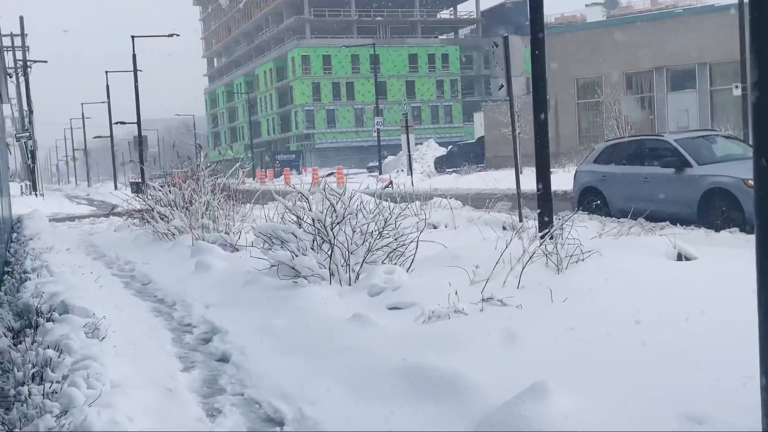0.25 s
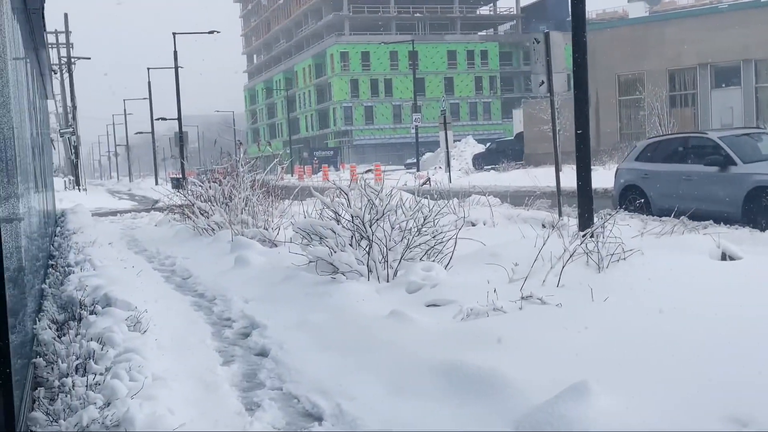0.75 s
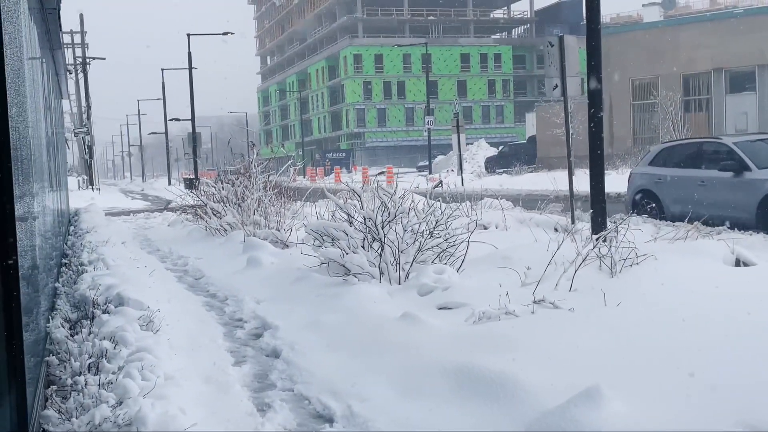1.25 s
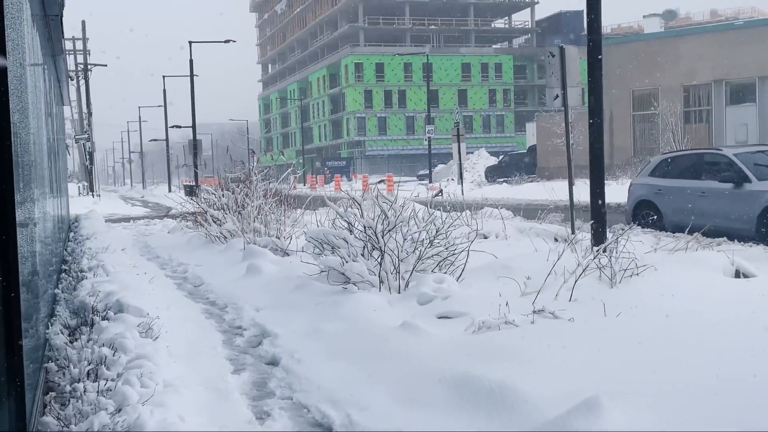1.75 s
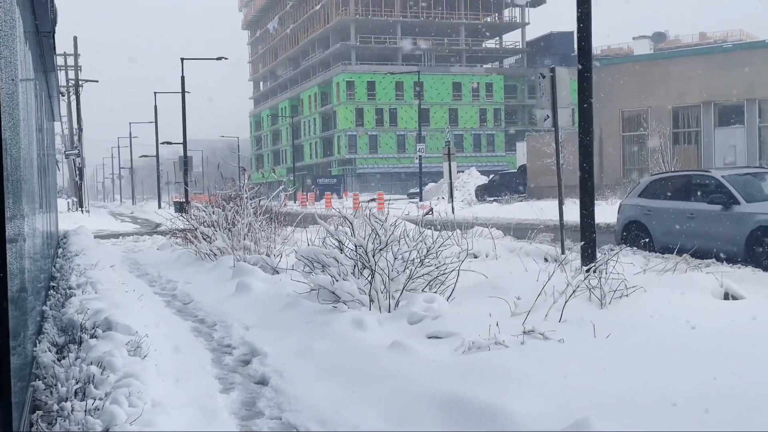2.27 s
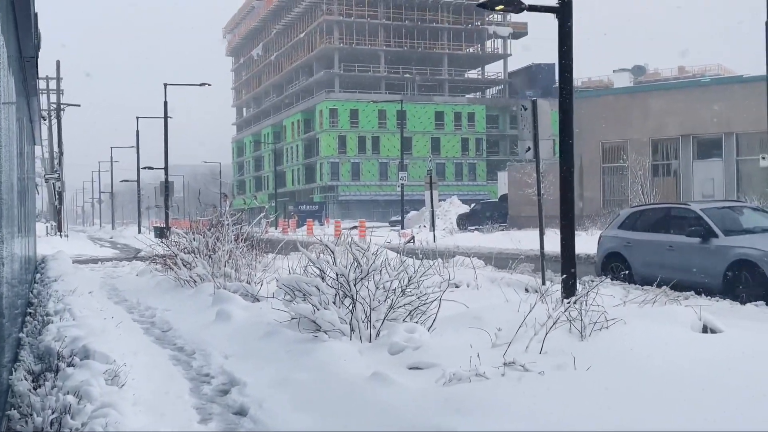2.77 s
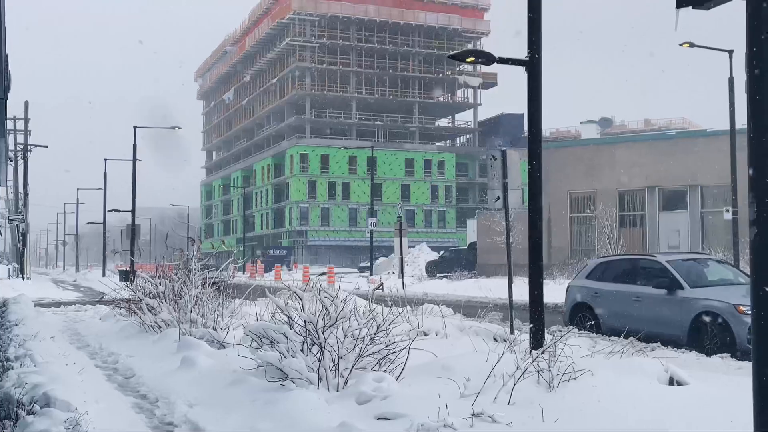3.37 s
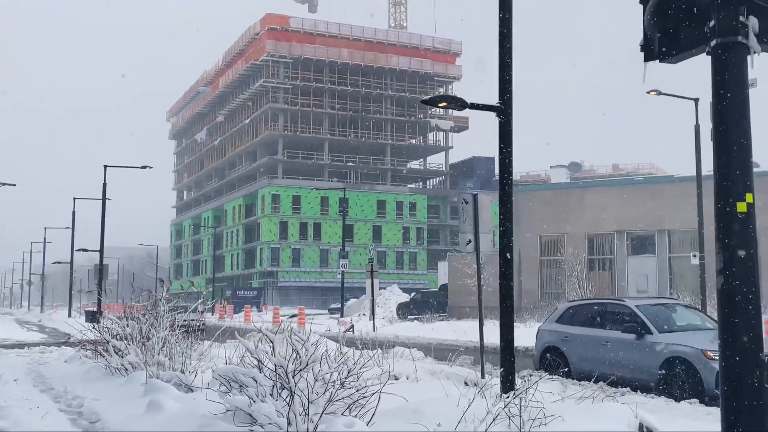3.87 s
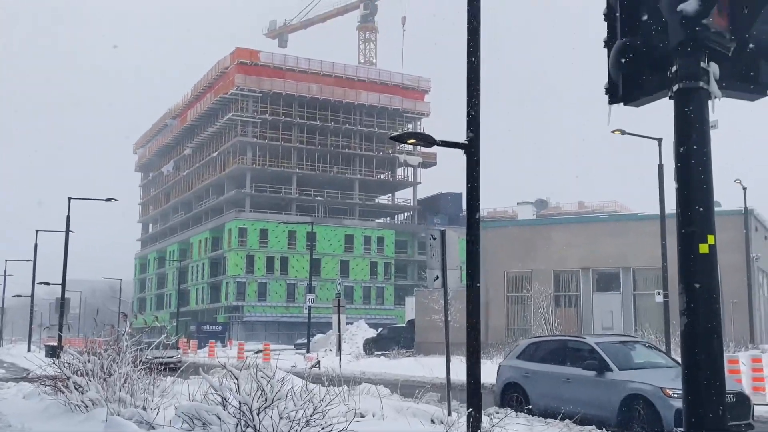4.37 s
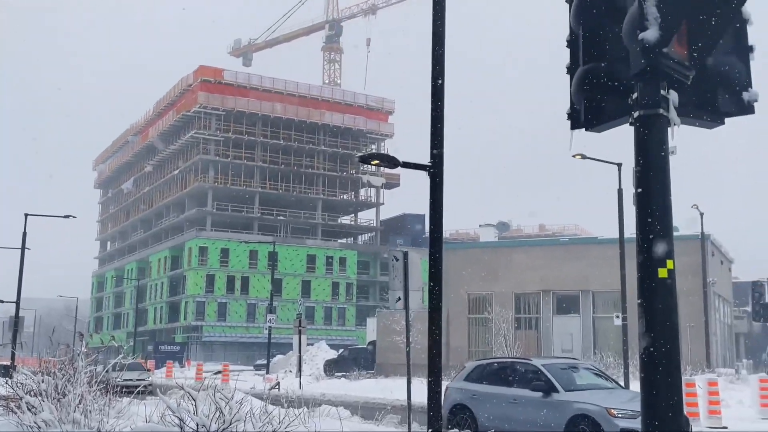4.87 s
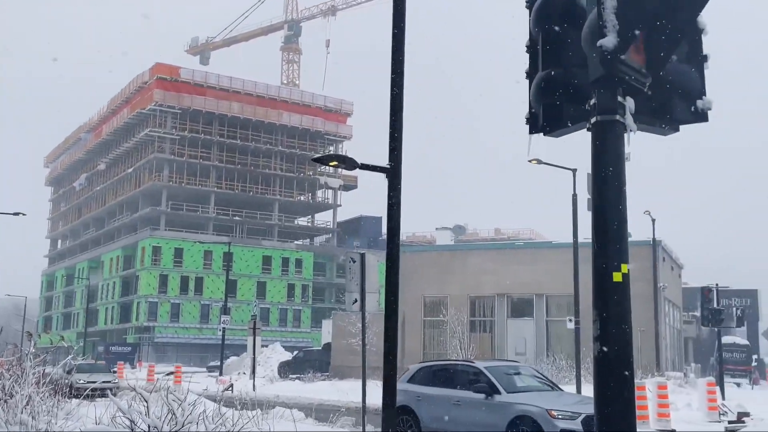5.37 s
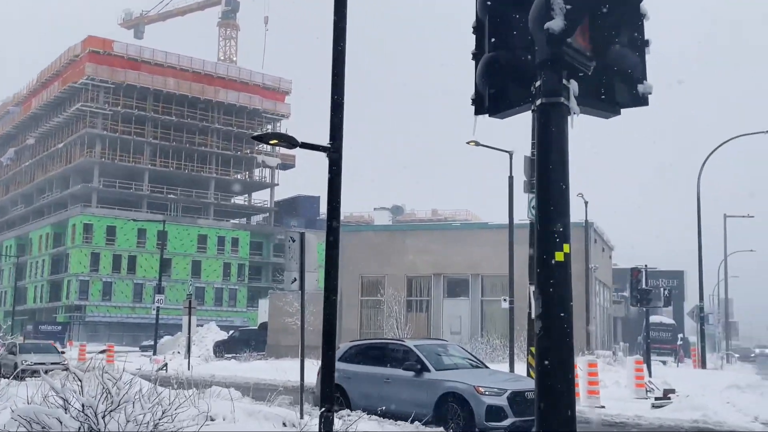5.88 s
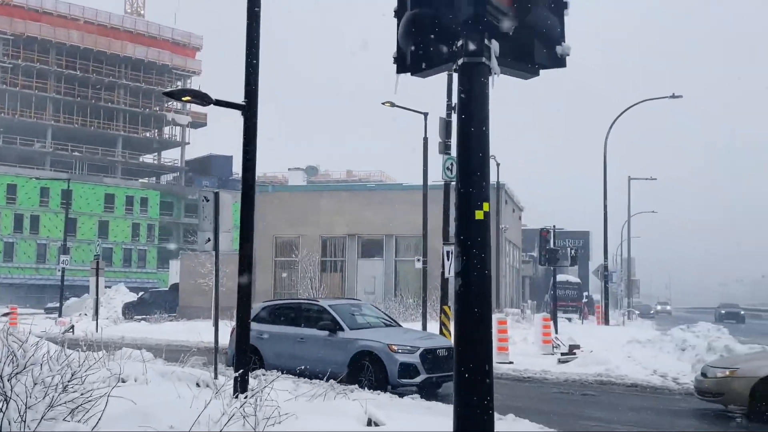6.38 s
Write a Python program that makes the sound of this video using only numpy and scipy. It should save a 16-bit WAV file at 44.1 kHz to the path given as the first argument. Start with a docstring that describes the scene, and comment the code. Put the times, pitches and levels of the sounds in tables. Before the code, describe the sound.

Wet tyres swell, swish by and fade over a distant traffic roar, with gusty low wind buffeting and faint brake squeaks late on.

```python
"""A snowy city street from the pavement, on a windy day, with a stereo microphone out in the wind.
First a far roar of shaped noise, an engine's low tones pulling away, and wind: rumbling noise, pressure thumps.
A car nears, its tyres a moving noise spectrum with spray and ticking drops; near 2.2 s its exhaust tones sink.
Then slush swishes on as it leaves and a far engine hums. Late on come gliding brake tones, dull slaps of
slush, one high tick and an engine throb further off, all in front of the roar."""
import sys
import numpy as np
from scipy import signal
from scipy.fft import rfft, irfft
from scipy.io import wavfile
from scipy.ndimage import uniform_filter1d

SR = 44100
rng = np.random.default_rng(int(sys.argv[2]) if len(sys.argv) > 2 else 0)


def unload_audio(sound):
    """Save the sound as a 16-bit wav file, at the path given as the first command line argument."""
    columns = np.transpose(np.atleast_2d(sound))
    # keep every value between -1 and 1, then stretch to whole-number steps
    steps = np.round(np.clip(columns, -1, 1) * 32767)
    wavfile.write(sys.argv[1], SR, steps.astype(np.int16))


N = 292383
TIME = np.arange(N) / SR
FRAME_S = np.arange(N // 256 + 5)[:, None] * 256 / SR  # one frame every 256 samples
BIN_HZ = np.fft.rfftfreq(1024, 1 / SR)


def amp(db):
    """Decibels to gain."""
    return 10 ** (np.asarray(db) / 20)


def unit(x):
    """Scales to rms 1."""
    return x / np.sqrt(np.mean(abs(x) ** 2) + 1e-30)


def bump(x, centre, half_width):
    """A smooth rise and fall of height 1 around a time or frequency."""
    return np.exp(-((x - centre) / half_width) ** 2)


def ramp(t, s, length):
    """A smooth step from 0 to 1 around the time s."""
    return (1 + np.tanh((t - s) / length)) / 2


def over_hz(points, hz):
    """Reads a table on a log-frequency axis."""
    f, value = np.transpose(points)
    return np.interp(np.log(hz + 1), np.log(f + 1), value)


def by_frame(curve):
    """Reads a curve at the frame times."""
    return np.interp(FRAME_S, TIME, curve)


def waver(rate_hz):
    """Slow random motion of rms 1, mostly below rate_hz."""
    hz = np.fft.rfftfreq(N, 1 / SR)
    slow = rfft(rng.standard_normal(N)) / (1 + (hz / rate_hz) ** 4)
    return unit(irfft(slow, N))


def coloured(gain, likeness):
    """Two channels of unit noise with a spectrum gain(Hz) and a given likeness."""
    hz = np.fft.rfftfreq(N, 1 / SR)
    mid, side = irfft(rfft(rng.standard_normal((2, N))) * gain(hz), N)
    side = side * np.sqrt(abs((1 - likeness) / (1 + likeness)))
    return unit(np.array([mid + side, mid - side]))


def noise_band(centre_hz, width_hz, likeness):
    """Two channels of unit noise in one bell-shaped band."""
    return coloured(lambda hz: bump(hz, centre_hz, 2 * width_hz), likeness)


def band_power(centre_hz, width_hz):
    """A bell-shaped band over the bins, with a fixed total power."""
    bell = np.exp(-.5 * ((BIN_HZ - centre_hz) / width_hz) ** 2)
    return bell / bell.sum(-1, keepdims=True) / 2


def shape(points, reference_hz):
    """A spectrum scaled to unit power in its reference band."""
    low_hz, high_hz = reference_hz
    gain = amp(over_hz(points, BIN_HZ))
    return gain / np.linalg.norm(gain[(BIN_HZ > low_hz) & (BIN_HZ < high_hz)])


def patches(size):
    """A smooth random field of rms 1; size is its smoothing in (frames, bins)."""
    field = rng.standard_normal((len(FRAME_S), len(BIN_HZ)))
    for axis in (0, 1, 0, 1):
        field = uniform_filter1d(field, size[axis], axis)
    return unit(field)


def steadied(x, span_s):
    """Evens out the slow level of a noise, so that an envelope alone sets it."""
    return x / np.sqrt(uniform_filter1d((x ** 2).mean(0), size=int(span_s * SR)))


def image(rows):
    """Likeness and phase between the microphone's two ports as one complex value for each bin."""
    hz, likeness, turns = np.transpose(rows)
    size = np.clip(over_hz(np.c_[hz, likeness], BIN_HZ), 0, 1)
    return size * np.exp(2j * np.pi * over_hz(np.c_[hz, turns], BIN_HZ))


# the street between the two ports while the car approaches: pitch_hz, likeness (0-1), phase_turns
APPROACH_IMAGE = [(60, 0.7, 0.096), (330, 0.76, 0.035), (530, 0.8, 0.25), (1010, 0.42, 0.31),
                  (1300, 0.46, 0.39), (1600, 0.1, 0.49), (1940, 0.53, 0.9), (2200, 0.62, 0.82),
                  (2900, 0.97, 1), (3600, 0.96, 1), (13000, 1, 1)]
# the same once the car has passed: pitch_hz, likeness (0-1), phase_turns
LEAVING_IMAGE = [(60, 0.76, 0.093), (330, .62, -0.065), (530, 0.1, 0.081), (710, 0.16, 0.31),
                 (1000, 0.17, 0.28), (1660, 0.64, 0.11), (1890, .32, 0.097), (2170, 0.37, 0.093),
                 (2470, 0.76, -.06), (2900, 0.84, -0.083), (3700, 0.96, -0.026), (6100, 1, 0.05),
                 (13000, 1, -0.054)]
IMAGE_SWING_S, IMAGE_SWING_LENGTH_S = 2.2, 0.14


def street_noise(magnitude):
    """Noise from a time-varying spectrum as two ports hear it; its image swings across as the car goes by."""
    a, b, c, d = rng.standard_normal((4, len(FRAME_S), len(BIN_HZ)))
    past = ramp(FRAME_S, IMAGE_SWING_S, IMAGE_SWING_LENGTH_S)
    same = (1 - past) * image(APPROACH_IMAGE) + past * image(LEAVING_IMAGE)
    left = a + 1j * b
    right = same * left + np.sqrt(abs(1 - abs(same) ** 2)) * (c + 1j * d)
    z = np.array([left, right]) * magnitude
    return np.sqrt(2) * signal.istft(z.transpose(0, 2, 1), nperseg=1024, noverlap=768)[1][:, :N]


# colour of the far roar, before scaling to unit power in a band: pitch_hz, level_db (per Hz)
ROAR = [(20, -42), (55, -10), (120, -0.5), (250, 0.5), (330, -1), (430, -3), (560, -1), (750, 0.5),
        (1200, -3.5), (1800, -7), (2600, -14.5), (5000, -28.5), (8000, -38), (15000, -56)]


def far_traffic(level_db=-37.5, swell_db=1.66, swell_s=1.75, swell_length=1.0, patchy_db=1.21):
    """The diffuse roar of the streets around, a little louder as the car goes by."""
    roar_db = level_db + swell_db * bump(FRAME_S, swell_s, swell_length)
    colour = shape(ROAR, reference_hz=(450, 1300))
    return street_noise(amp(roar_db + patchy_db * patches(size=(14, 3))) * colour)


def facades(x, echo_db=-10, drift=.0006, count=10):
    """Buildings across the street send back weak echoes; their paths change as the cars move."""
    echoes = np.zeros((2, N))
    delays_s = rng.uniform(.008, .06, count)
    speeds = rng.uniform(-1, 1, count)
    signs = rng.choice([-1, 1], count)
    for delay_s, speed, sign in zip(delays_s, speeds, signs):
        earlier = np.round(abs(TIME - delay_s - drift * speed * TIME) * SR).astype(int)
        echoes += sign * x[:, np.minimum(earlier, N - 1)]
    return (x + amp(echo_db) * echoes / np.sqrt(count)) / np.hypot(1, amp(echo_db))


def engine(hz, level, orders, unsteady, flutter_db):
    """Firing tones, at multiples of hz, that wander a little in pitch and strength."""
    s, db = np.transpose(level)
    turns = np.cumsum(hz * (1 + unsteady * waver(13.1))) / SR
    fade = np.interp(TIME, [s[0] - .2, s[0], s[-1], s[-1] + .2], [0, 1, 1, 0])
    tones = np.zeros(N)
    for multiple, order_db in orders:
        strength = amp(order_db + flutter_db * waver(3.7))
        tones += strength * np.sin(2 * np.pi * (multiple * turns + rng.random()))
    return np.sqrt(2) * fade * amp(np.interp(TIME, s, db)) * tones


HUM_HZ = 99.5
# a brief far engine hum: time_s, level_db
HUM_LEVEL = [(3.7, -35.5), (4.0, -39), (4.2, -38.5)]


def far_hum():
    """A nearly steady engine note that comes through once the close car has gone by."""
    return engine(HUM_HZ, HUM_LEVEL, [(1, 0)], unsteady=0.01, flutter_db=-0.5)


THROB_HZ, THROB_RISE_HZ_PER_S = 56.8, 1.8  # it speeds up slowly
# a low engine throb further off, before its tones' own levels: time_s, level_db
THROB_LEVEL = [(4.6, -44), (5.0, -43), (5.45, -37), (5.6, -40), (5.85, -38), (6.03, -43), (6.28, -38),
               (6.47, -31.5), (6.63, -41)]


def throb():
    """An uneven engine further down the street: three firing tones that wander."""
    hz = THROB_HZ + THROB_RISE_HZ_PER_S * (TIME - THROB_LEVEL[0][0])
    return engine(hz, THROB_LEVEL, [(1, 3.0), (1.5, -10), (2.5, -5)], unsteady=0.024, flutter_db=0.9)


PULL_HZ, PULL_RISE_HZ_PER_S = 52, 3.2
# another engine pulling away at the start: time_s, level_db
PULL_LEVEL = [(0, -47), (.3, -52), (.5, -38), (.65, -35.5), (.85, -45)]


def pulling_away():
    """The low note of an engine gathering speed, soon lost in the street."""
    return engine(PULL_HZ + PULL_RISE_HZ_PER_S * TIME, PULL_LEVEL, [(1, 0)], unsteady=0.02, flutter_db=0.5)


# faint far brakes: start_s, rise_s, decay_s, pitch_hz (at the start), glide (share per s, at first), level_db
SQUEAKS = [(4.81, 0.056, 0.04, 494, .4, -35.5), (5.243, .01, 0.05, 1755, -0.57, -37),
           (5.445, 0.027, 0.046, 373, -0.54, -38)]


def squeaks(unsteady=0.0041, settle_s=.08):
    """Short tones from far brakes: each swells, slides to its final pitch and trails off."""
    wander = 1 + unsteady * waver(39.5)
    out = np.zeros(N)
    for s, rise_s, decay_s, hz, glide, db in SQUEAKS:
        age = np.maximum(TIME - s, 0)
        slide = 1 + glide * settle_s * np.tanh(age / settle_s)
        turns = np.cumsum(hz * wander * slide) / SR
        envelope = np.minimum(age / rise_s, 1) * np.exp(-np.maximum(age - rise_s, 0) / decay_s)
        out += amp(db) * envelope * np.sqrt(2) * np.sin(2 * np.pi * turns)
    return out


# small soft slaps of slush further off: loudest_s, half_length_s, centre_hz, width_hz, level_db
SLAPS = [(4.88, 0.017, 570, 45, -36), (5.075, .025, 700, 180, -38), (5.26, .015, 580, 60, -41),
         (5.265, 0.018, 1520, 130, -39)]


def slaps():
    """Each lump of slush lands as a short dull puff of noise."""
    out = np.zeros((2, N))
    for s, length, hz, width_hz, db in SLAPS:
        out += amp(db) * np.sqrt(bump(TIME, s, length)) * noise_band(hz, width_hz, likeness=0.41)
    return out


def tick(s=4.779, db=-42, hz=12000, length=.00014):
    """One faint, very high tick close by: a tone burst of a few cycles."""
    return amp(db) * bump(TIME, s, length) * np.cos(2 * np.pi * hz * (TIME - s))


# colour of the rumble, relative: pitch_hz, level_db (per Hz)
WIND = [(10, -60), (22, -34), (35, -5.5), (55, 3.5), (90, -0.5), (130, -10), (200, -12), (320, -30),
        (600, -26.5), (2000, -90)]
# gusts on the microphone, before the wind's trim: loudest_s, half_length_s, level_db
GUSTS = [(0.17, 0.052, -36), (.68, 0.13, -33), (0.933, 0.04, -41), (1.78, 0.062, -37), (2.0, 0.065, -33),
         (3.138, 0.2, -27.5), (3.38, 0.18, -29.5), (5.66, 0.087, -31), (5.88, 0.068, -33), (6.17, .08, -34)]
# spells of finer turbulence: loudest_s, half_length_s, centre_hz, width_hz, level_db
FLUTTERS = [(0.748, .035, 225, 55, -34.5), (0.928, 0.045, 100, 22, -30.5), (1.787, 0.05, 200, 75, -37),
            (3.22, 0.041, 190, 55, -34.5), (3.37, 0.04, 200, 70, -39), (4.887, 0.094, 150, 30, -37.5),
            (5.716, 0.068, 199, 80, -35)]
# the wind picks up from a calm to a steady breeze (levels before the trim)
CALM_DB, BREEZE_DB, PICKUP_S, PICKUP_LENGTH_S = -42, -31, 1.52, 0.19


def wind(trim_db=-2, lumpy_db=1.5):
    """Turbulence at the ports: a lumpy rumble, with spells of finer flutter."""
    picked_up = ramp(TIME, PICKUP_S, PICKUP_LENGTH_S)
    power = amp(CALM_DB + (BREEZE_DB - CALM_DB) * picked_up) ** 2
    for s, length, db in GUSTS:
        power += amp(db) ** 2 * bump(TIME, s, length)
    rumble = steadied(coloured(lambda hz: amp(over_hz(WIND, hz)), likeness=0.94), span_s=.11)
    flutter = np.zeros((2, N))
    for s, length, hz, width_hz, db in FLUTTERS:
        noise = steadied(noise_band(hz, width_hz, likeness=0.97), span_s=0.051)
        flutter += amp(db) * np.sqrt(bump(TIME, s, length)) * noise
    return amp(trim_db + lumpy_db * waver(17)) * np.sqrt(power) * rumble + flutter


# the strongest eddies that hit the microphone: centre_s, level_db (before the pulse's taper), pitch_hz
BUFFETS = [(0.692, -25, 240), (0.773, -21, 250), (0.784, -15, 205), (0.858, -20.5, 230),
           (0.927, -22.5, 180), (0.936, -22, 170), (0.947, -19, 280), (0.961, -19, 199),
           (1.733, -20.5, 205), (1.815, -17, 159), (1.929, -21, 85), (2.012, -17, 81.5), (2.969, -16.5, 95),
           (3.179, -21, 80), (3.197, -17, 95), (3.248, -19, 135), (3.301, -15, 85), (3.349, -20, 171),
           (3.376, -18, 90), (3.387, -24, 190), (3.459, -19, 85), (3.849, -22.5, 101), (4.263, -21, 79),
           (5.174, -21, 70), (5.353, -17, 95), (5.431, -24, 66), (5.6, -19, 85), (5.631, -20, 95),
           (5.643, -23, 170), (5.659, -20, 130), (5.712, -21, 150)]


def buffets(cycles=0.52):
    """Each eddy is one quick push and pull of pressure."""
    out = np.zeros(N)
    for s, db, hz in BUFFETS:
        near = abs(TIME - s) < .1
        turns = (TIME[near] - s) * hz
        pulse = np.exp(-(turns / cycles) ** 2) * np.sin(2 * np.pi * turns)
        out[near] += amp(db) * pulse * rng.choice([-1, 1])
    return out


def passing_db(path, fall_db):
    """Level of a source driving by on a straight line, relative to its nearest point."""
    nearest_s, cover_s = path
    return -fall_db * np.log10(np.hypot(1, (TIME - nearest_s) / cover_s))


# the close car: nearest_s, cover_s (time to cover its own distance from the pavement)
PASS = (2.22, 1.44)
# hollow road noise under the passing car: centre_hz, width_hz, level_db (when nearest)
ROAD_BOOM = [(324.5, 21, -43.5), (560, 110, -48.5)]


def road_boom(fall_db=20):
    """Hollow resonances under the car swell and fade with its distance."""
    boom = np.zeros((2, N))
    for hz, width_hz, db in ROAD_BOOM:
        boom += amp(db) * noise_band(hz, width_hz, likeness=0.36)
    return amp(passing_db(PASS, fall_db)) * boom


# partials of the exhaust, relative to its level curve: multiple, level_db
EXHAUST_ORDERS = [(1, -1.5), (1.5, -21.5), (2, -17.5), (3.5, -23)]
# Doppler glide of the drone: mean pitch_hz, shift (share), turn_s, glide_s (time it takes)
EXHAUST_GLIDE = (162.5, .056, 2.2, 0.365)
# the drone, before partial and channel levels: time_s, level_db
EXHAUST_LEVEL = [(.45, -45), (.65, -37.5), (1.1, -44), (1.5, -36), (1.75, -37), (1.86, -29), (2.08, -29.5),
                 (2.27, -34), (2.7, -35.5), (2.84, -38), (2.96, -47)]
# its octave flares as the tailpipe turns this way: loudest_s, half_length_s, extra_db
TAILPIPE = [(2.563, 0.04, 12), (2.672, 0.04, 16)]


def exhaust():
    """The drone of the close car, high on approach, lower and briefly brighter as it leaves."""
    mean_hz, shift, turn_s, glide_s = EXHAUST_GLIDE
    along = (TIME - turn_s) / glide_s
    hz = mean_hz * (1 - shift * along / np.hypot(1, along))
    flare_db = sum(db * bump(TIME, s, length) for s, length, db in TAILPIPE)
    orders = [(multiple, db + flare_db * (multiple == 2)) for multiple, db in EXHAUST_ORDERS]
    drone = engine(hz, EXHAUST_LEVEL, orders, unsteady=0.0033, flutter_db=0.5)
    return drone * amp([[-.2], [1.2]])  # dB, left and right


# tread hiss, before the tyre and drop trims: level_db (when nearest), fall_db (per tenfold distance)
TREAD = (-32, 20.2)
# the hiss dips between the front and the rear wheels: centre_s, half_length_s, dip_db
AXLE_GAP = (2.145, 0.053, -3.5)


def tread_level():
    """The tread hiss follows the car's distance and dips between the axles (dB)."""
    s, length, dip_db = AXLE_GAP
    level_db, fall_db = TREAD
    return level_db + passing_db(PASS, fall_db) + dip_db * bump(TIME, s, length)


# the cloud of fine spray: nearest_s, cover_s (time to cover its own distance from the pavement)
SPRAY_PASS = (1.69, 1.58)
# its fizz, before the tyre and drop trims: level_db (when nearest), fall_db (per tenfold distance)
FIZZ = (-50, 47.7)
# wet patches that throw up more spray: loudest_s, half_length_s, extra_db (before the treble weighting)
SPLASHES = [(.3, 0.076, 3.5), (0.75, 0.054, 3.5), (1.22, 0.06, 3), (1.5, .02, 7), (1.91, 0.066, 9.5),
            (2.237, .04, 5), (2.45, 0.066, 5.5), (4.49, 0.058, 4)]
# once the car is past, its body hides part of the spray
SHADE_DB, SHADE_S, SHADE_LENGTH_S = -3.5, 3.8, 0.39


def spray_level():
    """The spray fades faster with distance than the tread and leaps at each wet patch (dB)."""
    level_db, fall_db = FIZZ
    splashes = sum(db * bump(TIME, s, length) for s, length, db in SPLASHES)
    shade = SHADE_DB * ramp(TIME, SHADE_S, SHADE_LENGTH_S)
    return level_db + passing_db(SPRAY_PASS, fall_db) + shade + splashes


def droplets(trim_db=-6, per_s=900, count=16):
    """Flung drops of slush patter back on the road, each a tick of a few cycles; they follow tread and spray."""
    out = np.zeros((2, N))
    t = np.arange(-64, 64) / SR
    spread_db = 2.5
    for hz in np.geomspace(2000, 7000, count):
        falls = rng.random(N) < per_s / count / SR
        sizes = amp(spread_db * np.minimum(rng.exponential(1, N), 4)) * falls
        drop = np.exp(-(t * hz / 1.6) ** 2) * np.cos(2 * np.pi * hz * t) / np.sqrt(hz)
        out += np.outer(rng.uniform(0.95, 1, 2), np.convolve(sizes, drop, "same"))
    return amp(trim_db + (tread_level() + spray_level()) / 2) * unit(out)


# colour of the wet tread, before scaling to unit power in a band: pitch_hz, level_db (per Hz)
HISS = [(80, -14), (250, -9), (450, -8), (700, -7.5), (1200, -3), (2000, 2.5), (3000, -1.17), (4200, -4),
        (5000, -6), (5600, -8.5), (6200, -10.5), (7300, -10.5), (10000, -16), (12500, -21.5), (15500, -20)]
# the tread sings in two bands, a higher one towards the front and a lower one towards the rear,
# before splutter and lean: loudest_s, half_length_s, centre_hz, width_hz, level_db
TREAD_BANDS = [(1.62, 0.66, 2500, 540, -36), (3.25, 0.8, 1780, 400, -38)]
# water sizzles ahead of the approaching wheels, one row of the same columns
BOW_SIZZLE = (0.83, 0.75, 5900, 900, -38.5)
# tyres cutting through ridges of slush, before splutter and lean:
# loudest_s, rise_s, centre_hz, width_hz, level_db
SWISHES = [(0.5, 0.07, 4900, 700, -39), (1.15, .06, 3200, 700, -41), (1.32, .1, 3900, 500, -39),
           (1.52, 0.14, 1950, 240, -38), (1.995, 0.12, 2830, 560, -30.5), (2.02, 0.067, 6400, 900, -41),
           (2.3, 0.08, 2250, 600, -39), (2.76, 0.17, 1710, 190, -29), (2.85, 0.18, 4570, 450, -41),
           (2.995, 0.13, 1790, 220, -27.5), (3.3, 0.18, 1900, 260, -36.5), (3.58, 0.17, 4600, 550, -40),
           (3.79, 0.13, 4440, 640, -35.5), (3.79, 0.12, 7000, 800, -47), (4.0, .13, 4700, 1000, -44),
           (4.5, .15, 4400, 1100, -45), (5.48, .04, 6160, 1200, -51), (5.67, 0.065, 6150, 1400, -47.5)]
SWISH_CUT = 0.22  # a swish builds up, then stops short: its fall as a share of its rise


def tyres(trim_db=-2.5, spray_db=17, hollow_db=-9, patchy_db=1, ripple_db=0.7, splash_db=1.76, lean_db=1):
    """Wet tread hisses; thrown spray brightens it and splutters; ridges of slush swish."""
    hiss_db = by_frame(tread_level())
    fine_db = by_frame(spray_level()) - hiss_db
    colour = shape(HISS, reference_hz=(2300, 5500))
    # how strongly the spray sets each pitch: (Hz, share)
    treble = over_hz([(3000, 0.061), (5000, 0.27), (6500, 0.31), (10000, 0.79), (15000, 0.86)], BIN_HZ)
    splutter = splash_db * patches(size=(4, 120)) * (0.22 + treble) + patchy_db * patches(size=(12, 7))
    # reflections off road and walls comb the hiss, shifting slowly
    ripple = ripple_db * patches(size=(70, 3))
    # one band is hollow while the car is still far off
    hollow = hollow_db * bump(BIN_HZ, 1960, 280) * bump(FRAME_S, 0.39, 0.64)
    power = (amp(trim_db + hiss_db + hollow + treble * (fine_db + spray_db)) * colour) ** 2
    for s, length, centre_hz, width_hz, db in TREAD_BANDS + [BOW_SIZZLE]:
        power = power + amp(db) ** 2 * bump(FRAME_S, s, length) * band_power(centre_hz, width_hz)
    for s, rise_s, centre_hz, width_hz, db in SWISHES:
        swell = bump(FRAME_S, s, rise_s * np.where(FRAME_S < s, 1, SWISH_CUT))
        power = power + amp(db) ** 2 * swell * band_power(centre_hz, width_hz)
    # positive leans left: (Hz, dB)
    lean = lean_db * over_hz([(1300, -0.43), (3000, 1.36), (5000, 1.0), (7000, -0.53)], BIN_HZ)
    return street_noise(np.sqrt(power) * amp(splutter + ripple) * amp([[lean], [-lean]]))


def scene():
    """Street, passing car, engines and wind together."""
    street = facades(far_traffic() + squeaks() + tyres()) + road_boom() + droplets()
    engines = far_hum() + throb() + pulling_away() + exhaust()
    return street + engines + slaps() + tick() + wind() + buffets()


# the treble sounds wide, its phase turning between the ears: pitch_hz, phase_turns
TREBLE_TURN = [(5900, 0), (7300, .27), (7900, .42), (8700, .58), (9300, .72), (10800, .96), (12500, 1.04),
               (14000, 1.5)]
EDGE_HZ = 13950  # upper band limit


def record(dry):
    """The right channel turns in phase through the treble; then the band limit."""
    turn = np.exp(2j * np.pi * over_hz(TREBLE_TURN, np.fft.rfftfreq(N, 1 / SR)))
    pair = np.array([dry[0], irfft(rfft(dry[1]) * turn, N)])
    low_pass = signal.firwin(511, EDGE_HZ, window=("kaiser", 9), fs=SR)
    return signal.oaconvolve(pair, low_pass[None], "same", axes=1)


dry = scene()
out = record(dry)
unload_audio(out)
```